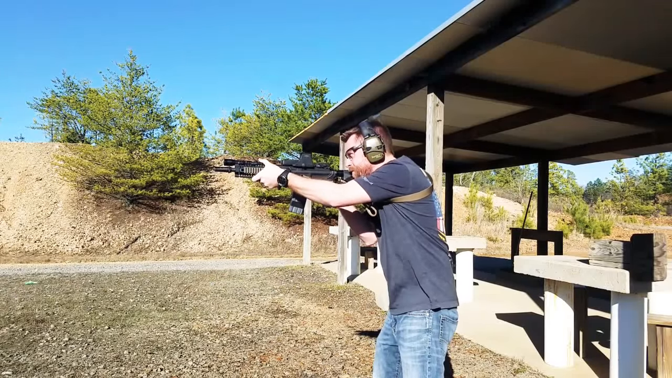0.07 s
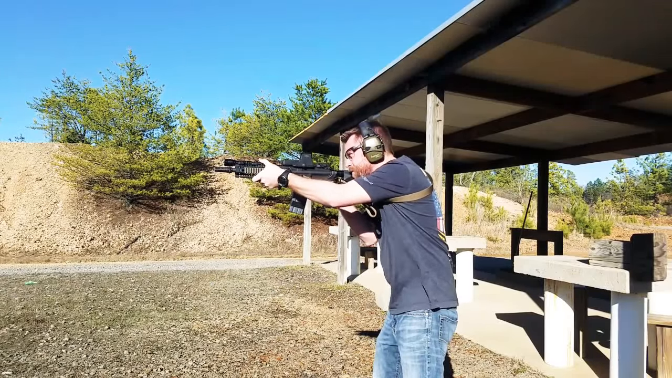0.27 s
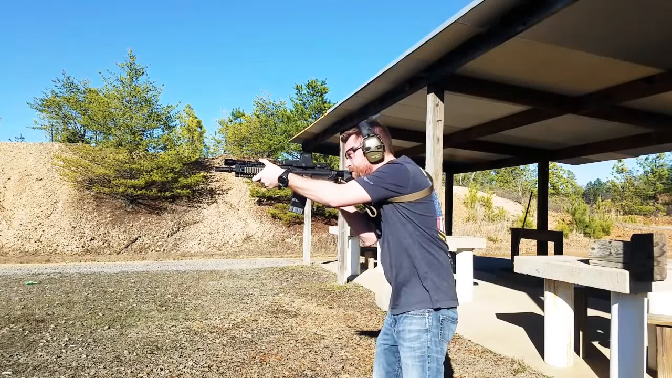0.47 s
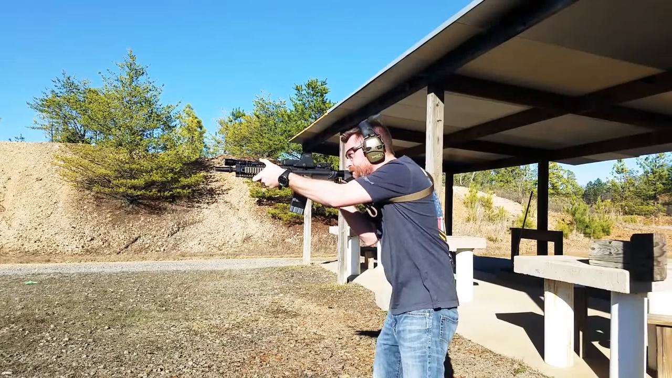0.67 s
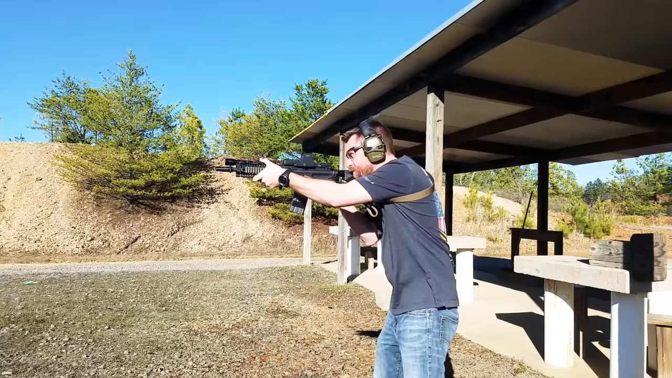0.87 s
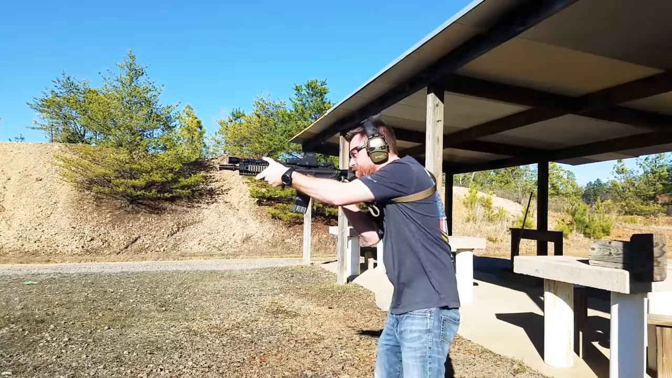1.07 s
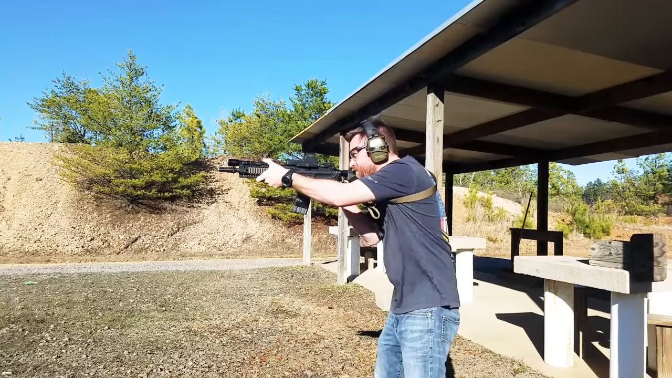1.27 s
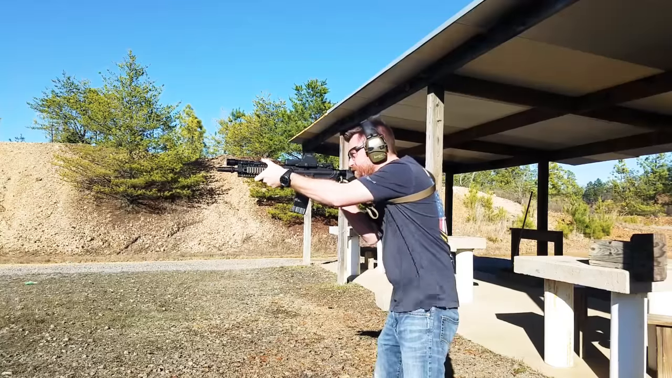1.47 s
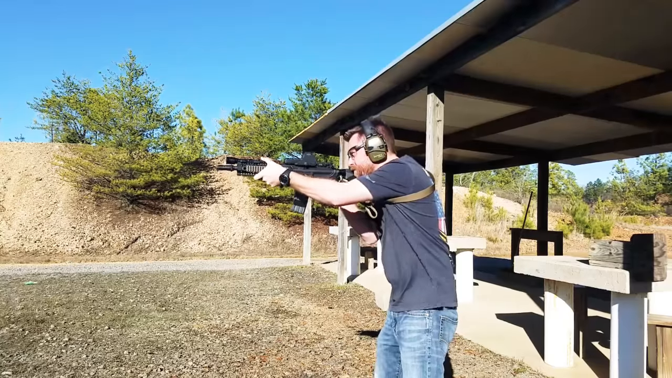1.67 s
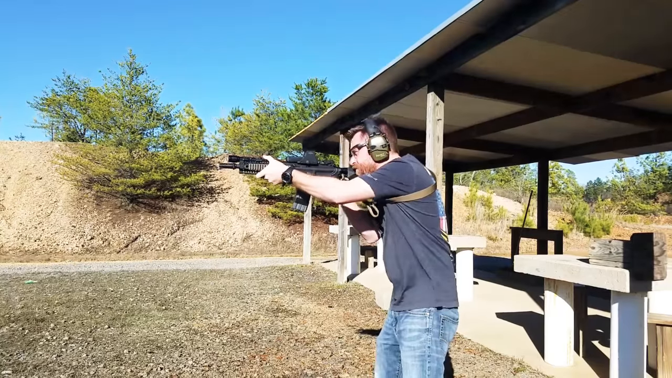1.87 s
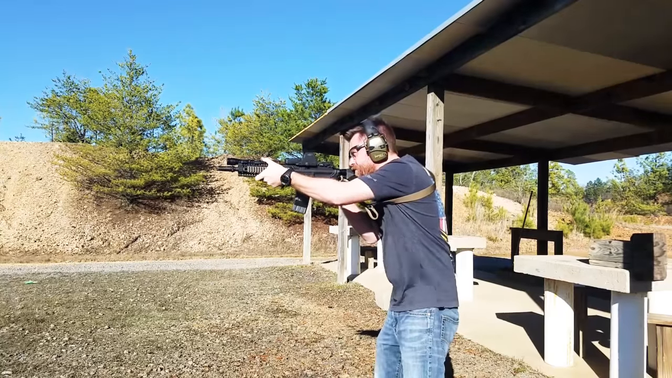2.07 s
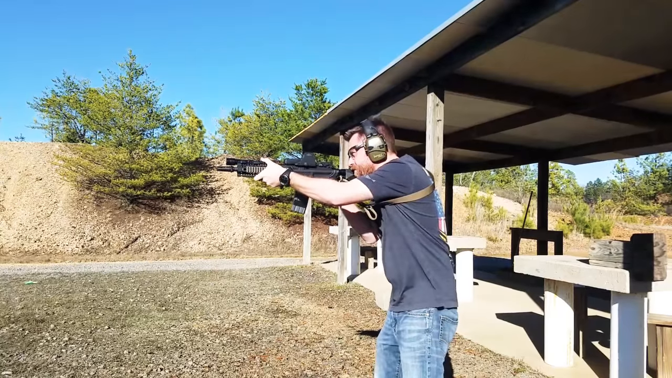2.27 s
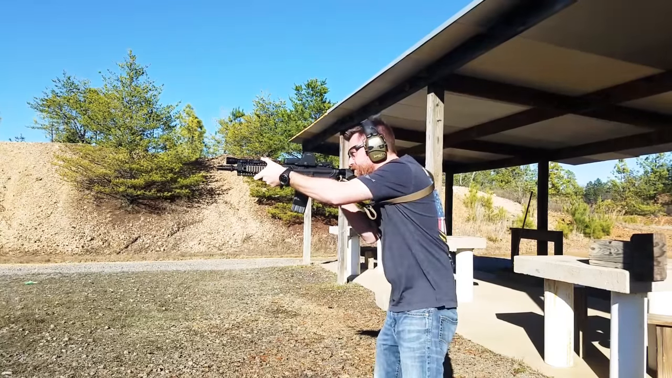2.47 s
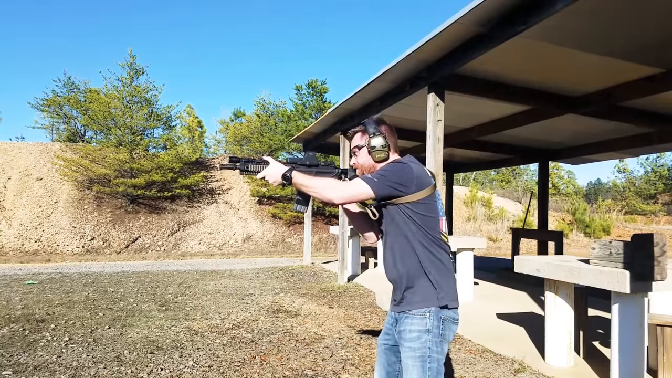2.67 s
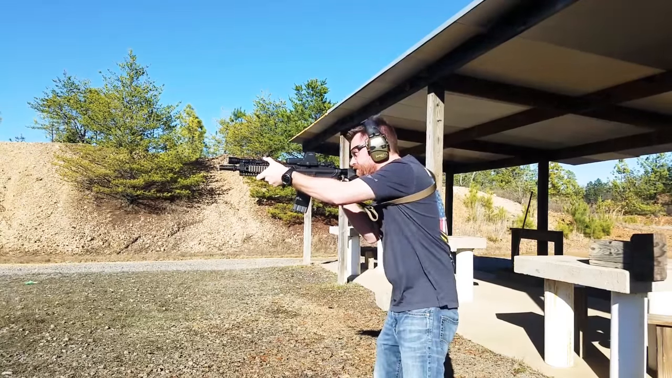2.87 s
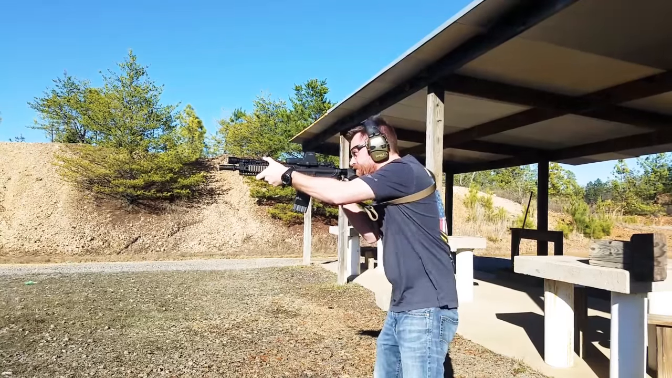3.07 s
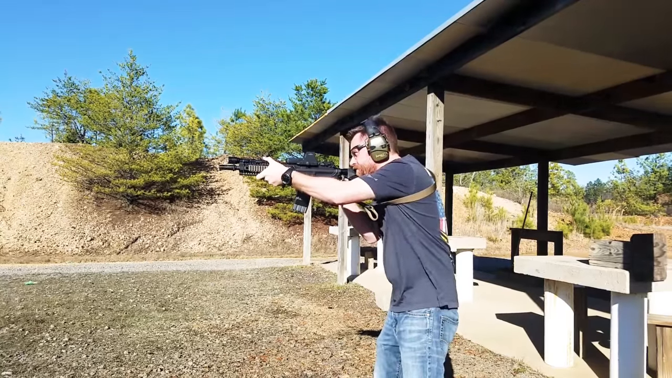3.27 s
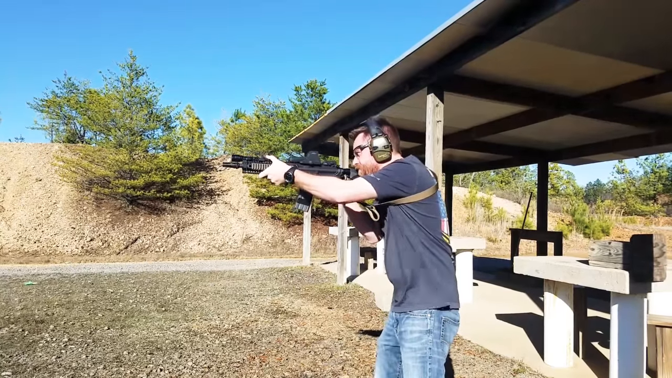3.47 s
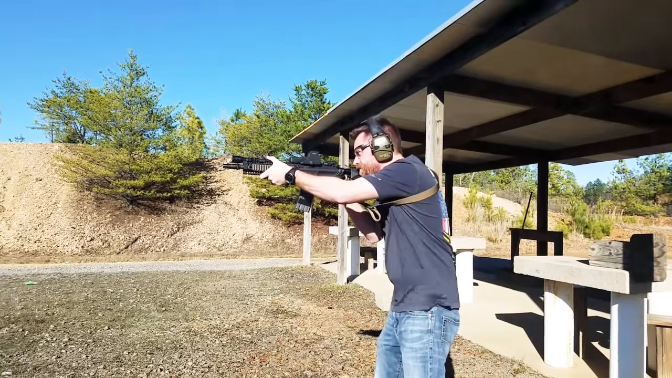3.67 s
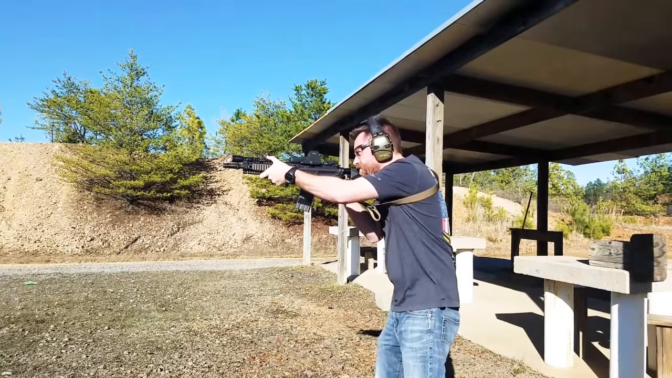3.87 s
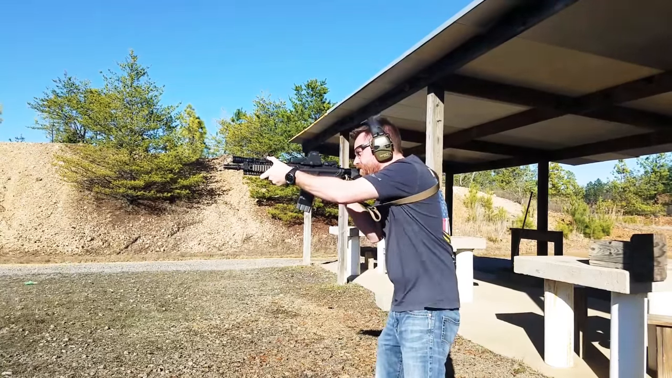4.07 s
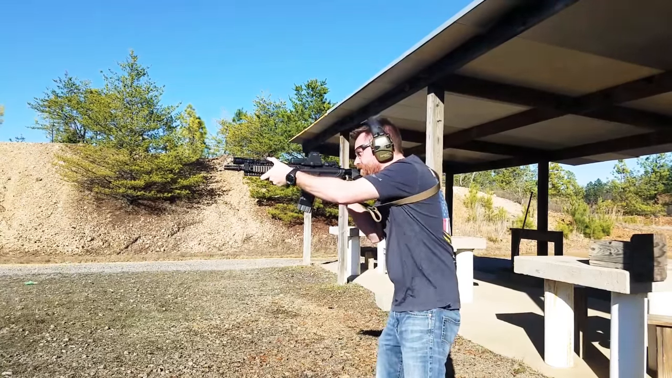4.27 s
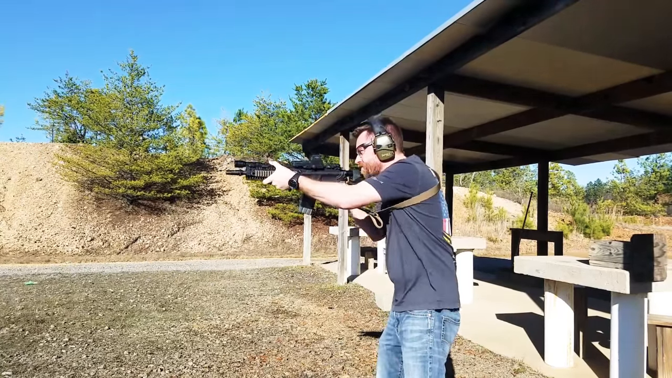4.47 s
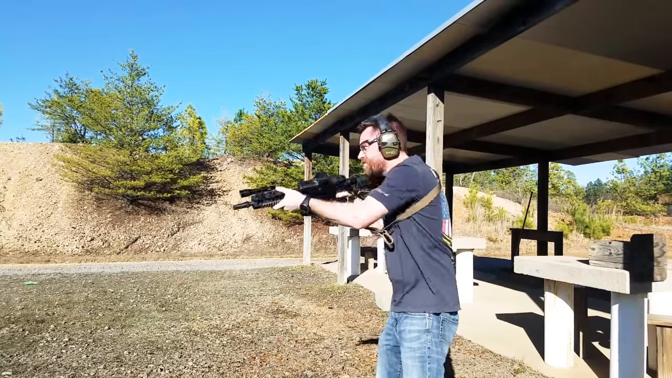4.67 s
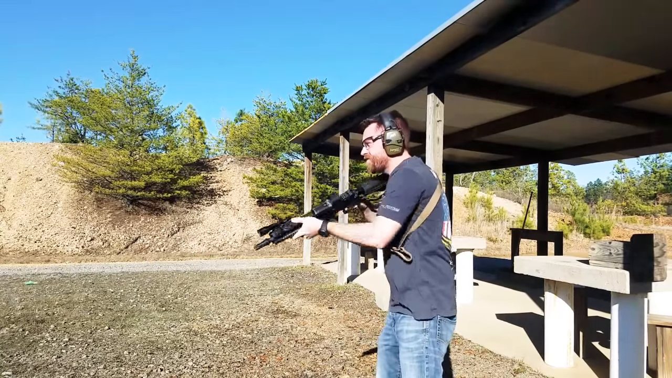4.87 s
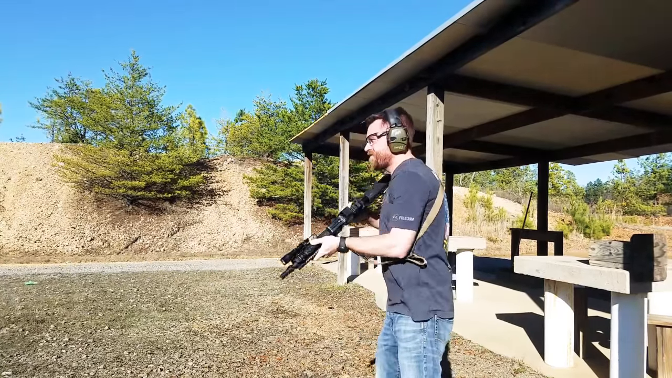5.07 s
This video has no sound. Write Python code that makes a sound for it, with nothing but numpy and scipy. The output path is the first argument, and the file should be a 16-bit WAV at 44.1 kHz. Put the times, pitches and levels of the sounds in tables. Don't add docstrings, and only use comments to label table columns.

```python
import sys
import numpy as np
from scipy import signal
from scipy.fft import rfft, irfft, next_fast_len
from scipy.io import wavfile
from scipy.ndimage import uniform_filter1d

SR = 44100
rng = np.random.default_rng(int(sys.argv[2]) if len(sys.argv) > 2 else 0)


def transcribe(u):
    v = np.clip(np.atleast_2d(u).T, -1, 1)
    q = np.round(v * 32767).astype(np.int16)
    wavfile.write(sys.argv[1], SR, q)


def decibels_to_gain(level_db):
    exponent = np.asarray(level_db, float) / 20
    return 10 ** exponent


N = 225428


def colour(x, points):
    hz, db = np.transpose(points)
    length = x.shape[-1]
    size = next_fast_len(length)
    f = np.fft.rfftfreq(size, 1 / SR) + 1
    gain = decibels_to_gain(np.interp(np.log(f), np.log(hz), db, left=-70, right=-70))
    y = irfft(rfft(x, size) * gain, size)[..., :length]
    return y / y.std()


def walk(rate):
    hold = int(SR / rate)
    steps = np.repeat(rng.standard_normal(N // hold + 1), hold)
    return 1.3 * uniform_filter1d(uniform_filter1d(steps, hold), hold)[:N]


def add(out, x, s):
    i = int(s * SR)
    out[:, i:i + x.shape[-1]] += x[..., :out.shape[1] - i]


def ring(modes, s, turns, rise_s):
    t = np.arange(int(s * SR)) / SR
    lead = np.array([[0], [turns]])
    gain = decibels_to_gain(np.array([[-2.], [2.]])) * np.minimum(t / rise_s, 1)
    total = 0
    for hz, db, t60 in modes:
        total = total + decibels_to_gain(db - 60 * t / t60) * np.sin(2 * np.pi * (hz * t + lead + rng.random()))
    return gain * total


def bursts(size, table):
    out = np.zeros((2, size))
    t = np.arange(2048) / SR
    for s, db, hz, ms in table:
        common = rng.standard_normal(len(t))
        pair = np.array([np.roll(common, 8), common]) + .6 * rng.standard_normal((2, len(t)))
        burst = colour(pair, [(hz / 4, -20), (hz / 1.5, 0), (hz * 1.5, 0), (hz * 3, -18), (hz * 8, -50)])
        envelope = np.minimum(t * hz, 1) * np.exp(-1000 * t / ms)
        add(out, decibels_to_gain(db) * burst * envelope, s)
    return out


# time in seconds, level in dB, upper rustle in dB relative to the thumps.
WIND = [(0, -52, -6), (.4, -50.5, -7.5), (.64, -40.5, -12), (1.0, -43, -8.5), (1.3, -56, 4.5),
        (1.75, -47.5, -4.5), (2.2, -50.5, -3), (2.6, -54.5, -4.5), (3.0, -52.5, 4.5), (3.35, -54.5, -2),
        (3.8, -54, 1), (4.12, -51, -4), (4.3, -43, -4.5), (4.55, -40, -4), (4.8, -41, -3.5),
        (5.11, -43, -4.5)]
# frequency in Hz, density in dB per Hz.
GUST = [(25, -17), (50, -7), (90, 0), (150, -4), (250, -10), (400, -19.5)]
# frequency in Hz, density in dB per Hz.
RUSTLE = [(150, -16), (300, 1), (600, -9), (900, -15), (1400, -27.5), (2500, -30.5)]
# time in seconds, level over the wind in dB, half length in seconds.
EDDIES = [(0.028, 10, 0.019), (0.098, -3.5, 0.033), (.172, 5.5, 0.023), (.26, -2, .025), (.308, 6.5, .02),
          (.356, -3, 0.022), (.44, 2.5, 0.024), (0.697, 1, .02), (0.809, 6.5, 0.015), (0.879, -19, 0.014),
          (.91, 8, 0.012), (2.319, -14, 0.044), (2.375, 4, .02), (2.444, 2, 0.022), (2.516, -8, 0.028),
          (1.66, -5, 0.053), (3.082, -8, 0.0092), (4.177, -18, 0.015), (4.33, 1.5, 0.013),
          (4.517, 1.5, 0.012), (4.998, 6.5, .012), (5.032, -14, 0.0089), (5.064, 3, .012)]
RUSTLE_SHARE, CALM_DB, LEAN_DB_PER_DB = 0.34, -56.5, 0.31


def wind():
    t = np.arange(N) / SR
    s, *columns = np.transpose(WIND)
    db, rustle_db = (np.interp(t, s, c) for c in columns)
    eddy_db = sum(over_db * np.exp(-.5 * ((t - at) / half) ** 2) for at, over_db, half in EDDIES)
    pan_db = -LEAN_DB_PER_DB * (db + eddy_db - CALM_DB) + 2.5 * walk(9)
    out = []
    for side in (1, -1):
        lumps = decibels_to_gain(eddy_db + 2.4 * walk(28)) * colour(rng.standard_normal(N), GUST)
        rustle = decibels_to_gain(RUSTLE_SHARE * eddy_db + 3.2 * walk(45)) * colour(rng.standard_normal(N), RUSTLE)
        out.append(decibels_to_gain(db + 2.0 + side * pan_db / 2) * (lumps + decibels_to_gain(rustle_db) * rustle))
    return np.array(out)


# frequency in Hz, level in dB.
HISS = [(200, -8.5), (500, -2.5), (1170, -7), (1870, 1), (2600, -11), (3400, -21), (5000, -20),
        (10000, -34.5)]
HISS_DB = -58


def hiss():
    common = rng.standard_normal(N)
    pair = np.array([np.roll(common, 12), common]) + .7 * rng.standard_normal((2, N))
    return decibels_to_gain(HISS_DB + 1.0 * walk(4.5)) * colour(pair, HISS)


# time in seconds, level in dB.
GATE = [(0, -74), (1.2, -82), (1.399, -93), (4.25, -95.5), (4.28, -74), (5.11, -76)]


def phone_hiss():
    own = colour(rng.standard_normal((2, N)), [(4000, -28.0), (8000, -4.5), (14000, -1.5), (15000, -1)])
    return decibels_to_gain(np.interp(np.arange(N) / SR, *np.transpose(GATE))) * own


# start in seconds, # peak in dB, centre frequency in Hz, length in milliseconds.
TICKS = [(1.0237, -28, 8200, 0.76), (1.836, -44.5, 10800, 2.4), (2.619, -42.5, 9700, 1.5),
         (3.396, -43.5, 7750, 1.1), (1.057, -26, 95, 25), (1.7797, -39.5, 1600, 2.6),
         (1.779, -58, 11000, 4.6), (2.428, -56, 4543, 3.0), (2.6045, -61.5, 9000, 4.5),
         (2.607, -35.5, 1570, 15), (3.015, -57, 8940, 3.2), (3.029, -51, 4000, 1.3),
         (3.0545, -37, 1700, 2.4), (3.213, -63, 7407, 3.0), (.632, -42.5, 600, 4.5), (.832, -45, 600, 3.4),
         (.901, -37, 400, 6), (3.736, -37.5, 700, 5), (3.923, -43.5, 900, 3.1), (4.901, -34.5, 489.2, 5.3),
         (4.609, -39, 820, 4.8)]


def ticks():
    return bursts(N, TICKS)


# time after the shot in seconds, left port lag in samples, likeness 0 to 1.
BEARING = [(0, 16, 0.27), (0.028, 14, 0.38), (0.098, 9.5, 0.4), (.2, 10.5, 0), (.3, -0.5, 0),
           (1.202, -4.5, 0.07)]


def ports(size):
    s, lag, like = np.transpose(BEARING)
    i = np.arange(size)
    like = np.clip(np.interp(i / SR, s, like), 0, 1)
    common = rng.standard_normal(size + 64)
    delay = np.clip(np.round(np.interp(i / SR, s, lag)), 0, 32).astype(int)
    pair = np.array([common[i + 32 - delay], common[i + 32]])
    mixed = np.sqrt(like) * pair + np.sqrt(1 - like) * rng.standard_normal((2, size))
    short = np.clip(np.fft.rfftfreq(size, 1 / SR) / 900, .3, 1)
    return short * rfft(mixed) + (1 - short) * rfft(pair)


def echoes(size, table, top_hz, sag_hz, gain_db, longer):
    out = np.zeros((2, size))
    s, lag, like = np.transpose(BEARING)
    for (at, db, ms), chance in zip(table, rng.random((len(table), 3))):
        hz = (top_hz - sag_hz * ms) * (1 + .1 * (chance[2] - .5))
        n = int(longer * ms * SR / 1000) + 8
        t = np.arange(n) / SR - n / SR / 2
        turn = 2 * np.pi * (hz * t * (1 - 0.044 * t / t[-1]) + chance[0])
        stray = 2.0 * (chance[1] - .5) * (1 - np.interp(at, s, like))
        shape = decibels_to_gain(db + gain_db) * np.hanning(n)
        start = max(at + t[0], 0)
        add(out[:1], shape * np.sin(turn + stray), start + np.interp(at, s, lag) / SR)
        add(out[1:], shape * np.sin(turn - stray), start)
    return out


# frequency in Hz, level in dB, t60 in seconds.
SCATTER = [(60, -57, 0.79), (170, -37, 0.45), (370, -20.5, 0.45), (700, -19.5, .42), (1240, -23, 0.31),
           (2330, -25, 0.39), (6900, -30, 0.38), (12800, -25.5, 0.31)]
# frequency in Hz, level in dB, t60 in seconds.
FAR = [(200, -54.5, 1.5), (600, -42, 1.3), (1090, -53, 1), (1600, -50, 2.2), (2560, -49.5, 1.9),
       (3370, -57, 1.8), (4500, -56.5, 1.44), (12000, -64, 1.1)]
BOOM_RISE_MS, CRACK_RISE_MS, BOOM_TOP_HZ = 20, 0.4, 646
BOOM_HOLD_MS, CRACK_HOLD_MS, HOLD_TOP_HZ = 61.5, 5.5, 2700
FAR_PATCHY_DB = 3


def scatter(noise):
    t = np.arange(noise.shape[1]) / SR
    near, far = np.transpose(SCATTER), np.transpose(FAR)
    octave = np.log2(np.fft.rfftfreq(len(t), 1 / SR) + 1)
    tone = rfft(noise)
    patchy_db = FAR_PATCHY_DB * walk(35)[:len(t)]
    out = 0
    for at in np.arange(np.log2(50), np.log2(17000), 1 / 3):
        db, t60 = (np.interp(at, np.log2(near[0]), c) for c in near[1:])
        far_db, far_t60 = (np.interp(at, np.log2(far[0]), c) for c in far[1:])
        hz = 2 ** at
        rise = CRACK_RISE_MS + BOOM_RISE_MS / (1 + (hz / BOOM_TOP_HZ) ** 6)
        hold = CRACK_HOLD_MS + BOOM_HOLD_MS / (1 + (hz / HOLD_TOP_HZ) ** 6)
        window = np.cos(np.clip(3 * (octave - at), -1, 1) * np.pi / 2) ** 2
        band = irfft(tone * window, len(t))
        past = .012 * np.logaddexp(0, (t - hold / 1000) / .012)
        near_fade = decibels_to_gain(db - 60 * past / t60)
        far_fade = decibels_to_gain(far_db + patchy_db - 60 * t / far_t60) * (hz > 120)
        out = out + (1 - np.exp(-1000 * t / rise)) * (near_fade + far_fade) * band / band.std()
    return out


# frequency in Hz, level in dB, t60 in seconds.
ROOF = [(378, -13.5, .28), (432, -17, .26), (600, -19, .26), (682, -24, .24), (763, -18, .22),
        (314, -21, .26)]


def roof(t):
    swell = np.clip(t / 0.032, 0, 1) ** 2
    lag = np.array([[12], [0]]) / SR
    total = 0
    for (hz, db, t60), turn in zip(ROOF, rng.random(len(ROOF))):
        total = total + decibels_to_gain(db - 60 * t / t60) * np.sin(2 * np.pi * (hz * (t - lag) + turn))
    return swell * total


# time after the shot in seconds, level in dB, spread in seconds.
TREES = (.93, -51.5, .11)


def tree_line(t):
    at, db, spread = TREES
    points = [(900, -15), (1400, -0.5), (2200, 5.5), (3200, -11.0), (5000, -25.5)]
    noise = colour(rng.standard_normal((2, len(t))), points)
    return decibels_to_gain(db) * noise * np.exp(-.5 * ((t - at) / spread) ** 2)


# start in seconds, level in dB, limiter dip at the front in dB, dip length in milliseconds.
SHOTS = [(1.0302, 1, -6, 24.3), (1.8424, -0.5, 2.5, 12), (2.6259, -0.5, 3, 16), (3.4028, -0.5, 3, 12.7)]
# frequency in Hz, level in dB, t60 in seconds, right port lead in turns.
CAN = [(7494, -33, .75, .36), (7494, -30, .62, .3), (7494, -34, .6, .43), (7494, -28.5, .56, .26)]
# time after the shot in seconds, peak in dB, length in milliseconds.
THUDS = [(.0019, -18.5, 4.7), (0.0218, -10, 3.2), (.0357, -4.5, 9.7), (0.0412, -11.5, 2.0),
         (0.0547, -4, 3.46), (.0769, -5.5, 2.4), (0.0939, -7.5, 10.4), (0.1076, -9, 6.6),
         (0.1297, -7.5, 8.9), (0.1466, -32, 9.9), (.2015, -22.5, 6.4), (.2537, -18, 2.52),
         (0.2689, -22.5, 1.8), (0.3072, -29, 4.9), (0.3568, -30, 2.1)]
# time after the shot in seconds, peak in dB, length in milliseconds.
SLAPS = [(.0048, -17, 6.1), (.0301, -11, 9.2), (.0457, -2.5, 3.3), (.0574, -12, 2.4), (.0837, -8.5, 9),
         (.1173, -6, 2.6), (.143, -16.5, 2.1)]
# time after the shot in seconds, peak in dB, length in milliseconds.
SNAPS = [(0.0309, -16.5, .72), (0.04, -20, 2.5), (0.0521, -13.5, 4.1), (.1218, -23, 7.8)]
# time after the shot in seconds, peak in dB, frequency in Hz, length in milliseconds.
CRACKS = [(.052, -22, 2600, 2.5), (.2522, -26.5, 1900, 3.0), (.2524, -45, 5500, 3.0), (.331, -39, 800, 4.0),
          (.432, -52, 1900, 3.0), (.521, -51, 600, 4.0)]
THUD_HZ, THUD_SAG_HZ_PER_MS, SLAP_HZ, SNAP_HZ = 495, 13, 885, 2700


def rifle():
    out = np.zeros((2, N))
    size = next_fast_len(int(1.2 * SR))
    t = np.arange(size) / SR
    same = ports(size)
    steady = echoes(size, THUDS, THUD_HZ, THUD_SAG_HZ_PER_MS, gain_db=-3.0, longer=2.2)
    steady += echoes(size, SLAPS, SLAP_HZ, 0, gain_db=-1.0, longer=1.5)
    steady += echoes(size, SNAPS, SNAP_HZ, 0, gain_db=-2.5, longer=1.2)
    steady += roof(t) + bursts(size, CRACKS) + tree_line(t)
    fresh = np.clip(np.fft.rfftfreq(size, 1 / SR) / 6000, .08, 1)
    for (s, db, dip_db, dip_ms), can in zip(SHOTS, CAN):
        noise = irfft(np.sqrt(1 - fresh) * same + np.sqrt(fresh) * ports(size), size)
        dip = dip_db / (1 + np.exp(np.clip((1000 * t - dip_ms) / .6, -50, 50)))
        add(out, decibels_to_gain(db + dip) * (steady + scatter(noise)), s)
        add(out, ring([can[:3]], 1.0, can[3], 0.16), s)
    return out


# start in seconds, crack level in dB, crack length in seconds,
# modes as frequency in Hz, level in dB, t60 in seconds.
BOUNCES = [
    (4.272, -57, .028, [(9948, -60, .2), (10160, -51, .27), (6200, -61, .1), (13540, -68, .12)]),
    (4.292, -65, .03, [(10080, -60, .15), (12650, -72, .2)]),
    (4.481, -65, .04, [(9405, -72, .3), (10100, -70, .15), (12900, -70, .12), (11720, -76, .2)]),
]


def brass_case():
    out = np.zeros((2, N))
    t = np.arange(8192) / SR
    for s, crack_db, crack_s, modes in BOUNCES:
        add(out, ring(modes, .5, 0.18, .001), s)
        points = [(3500, -20), (5500, -1), (8000, -1), (11000, 7), (15000, -5)]
        crack = colour(rng.standard_normal((2, len(t))), points)
        add(out, decibels_to_gain(crack_db) * crack * np.exp(-t / crack_s), s)
    return out


def scene():
    return wind() + hiss() + ticks() + rifle() + brass_case()


def top_cut(x):
    return signal.sosfilt(signal.butter(12, 15800, fs=SR, output="sos"), x)


def record(dry):
    dry = dry + phone_hiss()
    soft = dry / (1 + np.abs(dry / 1.1) ** 4) ** .25
    soft = signal.sosfilt(signal.ellip(8, .3, 50, 14500, fs=SR, output="sos"), soft)
    return top_cut(np.clip(1.023 * soft, -1, 1))


dry = scene()
out = record(dry)
transcribe(out)
```